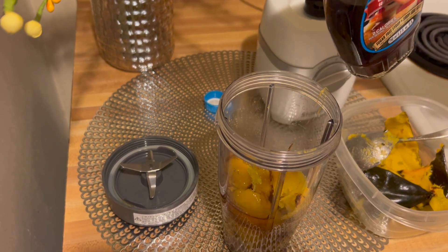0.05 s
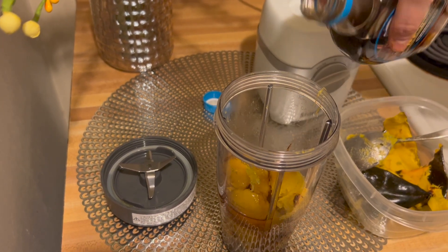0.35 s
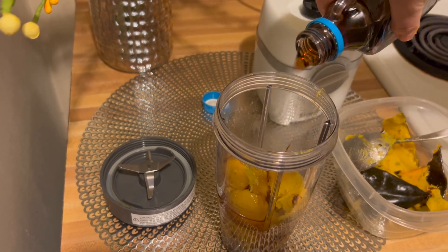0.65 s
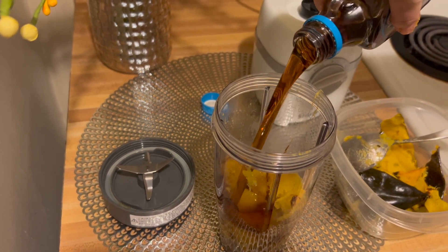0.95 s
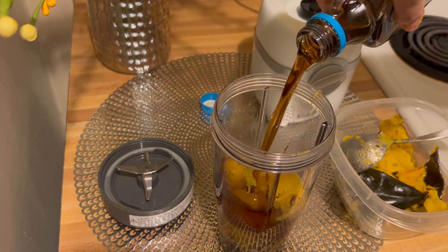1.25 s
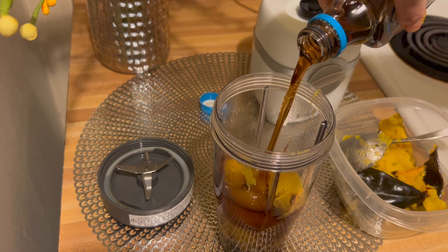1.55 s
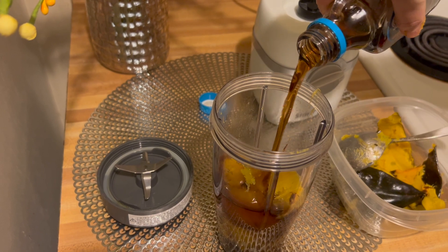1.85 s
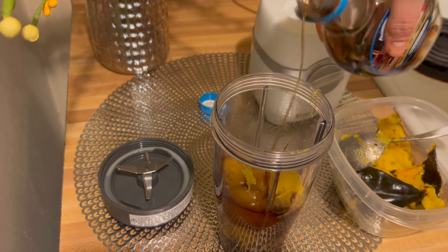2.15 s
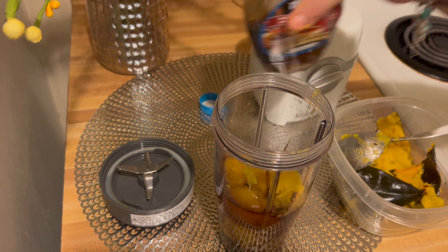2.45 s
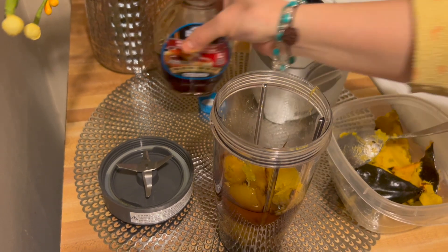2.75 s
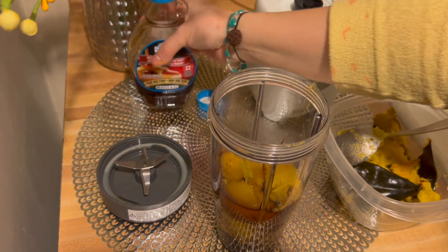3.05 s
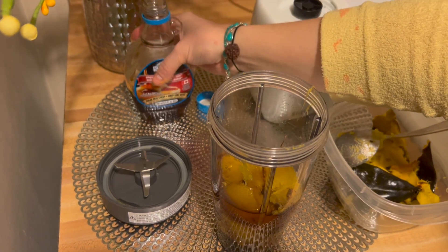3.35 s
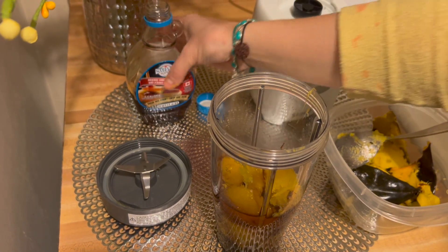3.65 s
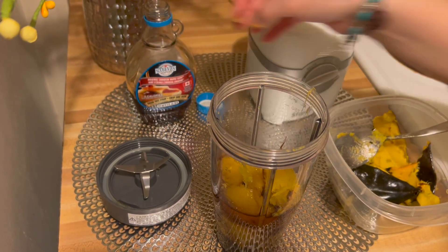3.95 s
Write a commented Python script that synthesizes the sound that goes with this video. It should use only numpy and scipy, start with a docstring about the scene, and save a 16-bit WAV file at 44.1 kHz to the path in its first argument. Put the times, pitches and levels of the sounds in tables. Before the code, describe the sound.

Syrup pours into a plastic blender cup with faint bubble pops, plops and sticky ticks. A bracelet clinks lightly, then the plastic bottle lands on the counter with a hollow thud. Heard close in a quiet, humming kitchen.

```python
"""Pouring syrup into a blender cup

Syrup runs from a plastic bottle onto soft squash in a quiet, humming kitchen. The thick stream is
almost silent: small bubbles pop, air pockets plop and the sticky bottle ticks. A bracelet clinks
and a sleeve rustles as the arm moves, then the bottle lands on the counter with a hollow thud."""
import sys
import numpy as np
from scipy import signal
from scipy.fft import rfft, irfft
from scipy.io import wavfile

SR = 44100
rng = np.random.default_rng(int(sys.argv[2]) if len(sys.argv) > 2 else 0)


def generate_wav(signal):
    """Clip the signal to [-1, 1] and save it as 16-bit WAV at the path in sys.argv[1]."""
    frames = np.transpose(np.atleast_2d(signal))
    scaled = np.clip(frames, -1, 1) * 32767
    pcm = np.round(scaled).astype(np.int16)
    wavfile.write(sys.argv[1], SR, pcm)


N = 176400
TIME = np.arange(N) / SR
HZ = np.fft.rfftfreq(N, 1 / SR)

# The fine, high fizz in both ticks and rustles: pitch_hz, level_db
FIZZ_TONE = [(7000, -52), (10500, -7), (12700, -6.5), (14000, -10), (15500, -36)]


def amp(db):
    """Turns decibels into a number to multiply a sound by."""
    return 10 ** (np.asarray(db) / 20)


def curve(points, hz):
    """Looks up values between rows of (pitch_hz, value), spacing octaves evenly."""
    pitches, values = np.transpose(points)
    return np.interp(np.log(hz + 1), np.log(pitches + 1), values)


def pan(db):
    """Left and right gains that make the left side louder by db."""
    return amp(np.array([[db / 2], [-db / 2]]))


def add(mix, start_s, sound):
    """Mixes a sound in at its start time."""
    part = mix[..., max(round(start_s * SR), 0):][..., :sound.shape[-1]]
    part += sound[..., :part.shape[-1]]


def fade(t, fade_s):
    """A level that falls by 60 dB in fade_s seconds."""
    return np.exp(-np.log(1000) * t / fade_s)


def puff(loudness, tone):
    """Noise that follows a loudness shape, filtered afterwards so its edges stay soft."""
    gain = amp(curve(tone, HZ))
    return irfft(rfft(loudness * rng.standard_normal(N)) * gain / np.sqrt(np.mean(gain ** 2)), N)


def room(sound, echo_db, build_s=0.0017):
    """Adds the kitchen's echoes, which build up and then die away, the highest fastest."""
    # How long the room rings: pitch_hz, fade_s
    ring_times = [(100, 0.45), (400, 0.33), (1200, 0.45), (4000, 0.22), (13000, 0.12)]
    echoes = rng.choice([-1., 1.], (2, SR // 2)) * (rng.random((2, SR // 2)) < .1)
    echoes *= np.minimum(TIME[:SR // 2] / build_s, 1) ** 2
    hz, t, bands = signal.stft(echoes, SR, nperseg=256)
    shared = 1 / (1 + (hz[:, None] / 450) ** 4)  # low echoes are alike on both sides
    bands[1] = shared * bands[0] + np.sqrt(1 - shared ** 2) * bands[1]
    tail = signal.istft(bands * fade(t, curve(ring_times, hz)[:, None]), SR, nperseg=256)[1]
    tail /= np.linalg.norm(tail, axis=1, keepdims=True)
    tail = signal.lfilter(*signal.butter(1, 272, "high", fs=SR), tail)
    return sound + amp(echo_db) * signal.fftconvolve(sound.mean(0)[None], tail, axes=1)[:, :N]


def kitchen_hum():
    """Ventilation makes a low rush of air, and appliances hum steady notes."""
    # The rush of air: pitch_hz, level_db
    air_tone = [(24, -23.5), (42, 1), (70, -1), (110, -7), (300, -13), (520, -21.5), (900, -18),
                (1600, -25), (2200, -39), (3200, -51.5), (6000, -57), (8800, -58.5), (12000, -55.5),
                (14500, -82)]
    # How alike the air sounds left and right: pitch_hz, likeness (1 = the same)
    air_likeness = [(50, 0.98), (200, 0.93), (500, 0.2), (1200, 0.045), (3000, 0.45), (12000, 0.13)]
    # Appliance notes: pitch_hz, level_db
    hum_notes = [(44, -62), (69, -66), (120, -61)]
    left, other = rfft(rng.standard_normal((2, N)))
    likeness = curve(air_likeness, HZ)
    right = likeness * left + np.sqrt(1 - likeness ** 2) * other
    air = irfft(np.array([left, right]) * amp(curve(air_tone, HZ)), N)
    hum = sum(amp(db) * np.sqrt(2) * np.sin(2 * np.pi * (hz * TIME + rng.random()))
              for hz, db in hum_notes)
    return pan(0.35) * (amp(-51.5) * air / air.std() + hum)


def bubbles(rows):
    """Each bubble rings for a few cycles, swelling and dying as its pitch climbs."""
    sound, t = np.zeros(N), TIME[:2048]
    sharpness, climb = 5, 0.072  # climb: share by which the pitch rises during the swell
    for peak_s, hz, db, length_ms in rows:
        rise_s = length_ms / 1000 * np.sqrt(sharpness / (8 * np.log(2)))
        age = t / rise_s
        swell = (age * np.exp(1 - age)) ** sharpness
        note = np.sin(2 * np.pi * hz * t * (1 + climb * (age / 2 - 1)))
        add(sound, peak_s - rise_s, amp(db) * swell * note)
    return sound


def crackles():
    """Random tiny bubbles, thickest when the stream starts and when it breaks off."""
    # Crackling along the pour: time_s, crackles_per_s, level_db
    crackling = [(0.759, 0, -65), (0.785, 902, -66), (.82, 52, -59.5), (1.5, 23, -79), (2.1, 30, -81),
                 (2.15, 507, -63), (2.2, 0, -87)]
    low_hz, high_hz, length_ms, spread_db = 1930, 4270, 0.88, 4
    times, rates, levels = np.transpose(crackling)
    chance, pitch, size = rng.random(N), rng.random(N), rng.standard_normal(N)
    hits = chance < np.interp(TIME, times, rates, left=0, right=0) / SR
    hz = low_hz * (high_hz / low_hz) ** pitch[hits]
    db = np.interp(TIME[hits], times, levels) + spread_db * size[hits]
    return bubbles(np.column_stack([TIME[hits], hz, db, np.full(len(hz), length_ms)]))


def syrup():
    """Bubbles burst with a wet snap, air pockets plop, and the sound bounces up and down the cup."""
    # Small bubbles bursting: peak_s, pitch_hz, level_db, length_ms
    pops = [(.015, 4020, -55.5, 0.99), (.1338, 4150, -54, 0.64), (0.5451, 4370, -49, 0.45),
            (0.7218, 6260, -56, 0.69), (0.8566, 4150, -38, 0.85), (0.856, 2566, -51.5, 2.12),
            (0.9377, 2620, -55, 1.4), (1.0051, 3260, -44.5, 0.55), (1.087, 3030, -46.5, 0.94),
            (1.1783, 2800, -55.5, 1.3), (1.2393, 3850, -61.5, 1.5), (1.3314, 2380, -58, 1),
            (1.358, 2570, -52.5, 1.7), (1.423, 3690, -49.5, 0.9), (1.646, 3260, -50, 0.63),
            (1.732, 6130, -63, 0.78), (1.859, 3170, -52, 0.49), (2.0301, 2730, -49.5, 1.02),
            (2.1038, 3990, -45.5, 0.69), (2.149, 2400, -56.5, 2.1), (2.1544, 3950, -53, 0.58),
            (2.307, 3490, -38.5, 0.64), (2.5117, 5930, -49, 0.23), (2.5304, 3760, -44.5, 0.59),
            (3.981, 2550, -49.5, 0.77)]
    # Air pockets folded in by the stream: peak_s, pitch_hz, level_db, length_ms
    plops = [(.7237, 670, -55, 3.6), (1.034, 770, -52, 4.5), (1.1315, 660, -51.5, 2.7),
             (1.2426, 750, -52.5, 3.5), (1.2783, 686, -50.5, 3.6), (1.7659, 905, -53, 4),
             (2.0203, 693, -48, 4.18), (2.0597, 833, -36.5, 2.3), (2.0743, 700, -57, 5.3)]
    # The snap of a bubble's skin tearing: pitch_hz, level_db
    skin_tone = [(1800, -23), (2500, -3.5), (4300, -5.5), (5300, -20), (8000, -27), (12000, -52)]
    # Notes of the cup that each pop rings: pitch_hz, width_hz, level_db
    cup_notes = [(2540, 400, -12.5), (4180, 370, -9)]
    tearing = np.zeros(N)
    for peak_s, _, db, _ in pops:
        add(tearing, peak_s, amp(db - 11) * fade(TIME[:SR // 20], fade_s=0.017))
    popping = bubbles(pops) + puff(tearing, skin_tone) + crackles()
    cup_ring = sum(amp(db) * signal.lfilter(*signal.iirpeak(hz, hz / width_hz, fs=SR), popping)
                   for hz, width_hz, db in cup_notes)
    direct = pan(3) * (popping + cup_ring) + pan(8.5) * bubbles(plops)
    sound = direct.copy()
    bounce_s, bounce_db = 0.0055, -12.5
    for bounce in (1, 2):
        add(sound, bounce * bounce_s, amp(bounce * bounce_db) * direct)
    return room(sound, echo_db=-7.5)


def bright_ticks():
    """Short, bright ticks: sticky clicks from the bottle and the snap of bracelet touches."""
    # Ticks, each a snap with fine fizz on top: start_s, snap_db, fizz_db
    ticks = [(0.33, -92, -60.5), (0.477, -57, -53), (0.573, -50, -54.5), (0.7778, -55, -53),
             (0.792, -50, -37.5), (0.8036, -49.5, -54), (0.855, -47, -64), (1.4937, -45, -69),
             (1.511, -70, -46.5), (1.618, -62, -63), (1.941, -45.5, -54.5), (2.1135, -60, -64),
             (2.1482, -54, -66), (2.3445, -49.5, -56), (2.652, -87, -54.5), (2.7353, -50, -55),
             (2.8335, -53, -54), (2.993, -61, -72), (3.112, -60, -66), (3.142, -55.5, -54),
             (3.65, -78, -59)]
    # The tone of the snap: pitch_hz, level_db
    snap_tone = [(1200, -13), (2500, -19), (5000, -5), (7800, 1.5), (10000, 2), (15500, -27)]
    loudness = np.zeros((2, N))
    for start_s, snap_db, fizz_db in ticks:
        add(loudness, start_s, amp([[snap_db], [fizz_db]]) * fade(TIME[:2048], fade_s=0.016))
    snap, fizz = loudness
    sound = (puff(snap, snap_tone) + puff(fizz, FIZZ_TONE)) / 2
    return room(pan(0.5) * sound, echo_db=-2)


def bracelet():
    """At each touch, beads rub together and a small metal charm rings briefly."""
    # Touches: start_s, level_db, main_pitch_hz, rest_db (turns the beads and other notes up or down)
    clinks = [(0.476, -61, 8200, -22), (.479, -48, 11000, -23), (1.941, -50, 7040, -21),
              (3.008, -72.5, 6900, 5), (3.055, -60, 6800, -8.5), (3.113, -77.5, 6900, 13),
              (3.138, -56, 6900, 0.5), (3.256, -59.5, 7040, 7)]
    # Notes of the charm: pitch_hz, level_db, fade_s
    charm_notes = [(4330, -7.5, 0.057), (5340, -12, .07), (6230, -7.5, .06), (6842, -1, 0.066),
                   (7200, -4.5, 0.046), (8080, -3.5, 0.051), (10900, -11, .1), (12900, -19, 0.068)]
    # Beads rubbing: pitch_hz, level_db
    bead_tone = [(1500, -11), (2900, -1.5), (8200, 1), (15500, -25)]
    ring, rub, t = np.zeros(N), np.zeros(N), TIME[:SR // 4]
    main_width_hz = 770
    for start_s, db, main_hz, rest_db in clinks:
        add(rub, start_s, amp(db + rest_db - 2.5) * fade(t, fade_s=0.036))
        for hz, note_db, fade_s in charm_notes:
            away = 1 - np.exp(-((hz - main_hz) / main_width_hz) ** 2)  # 0 at the main pitch, 1 far off
            note = fade(t, fade_s) * np.sin(2 * np.pi * hz * t)
            add(ring, start_s, amp(db + note_db + rest_db * away) * note)
    return room(pan(1) * (ring + puff(rub, bead_tone)), echo_db=-1.5)


def hiss_and_rustles():
    """Soft grainy swells of hiss as hand and sleeve brush; the slow one at 0.74 s is the hand turning the
    bottle."""
    # Swells: peak_s, fall_s (time to drop about 9 dB), hiss_db, fizz_db
    swells = [(.5, 0.032, -74, -76), (.74, 0.21, -74.5, -108), (2.163, 0.029, -70, -70.5),
              (2.35, 0.058, -82, -85), (2.66, 0.16, -93.5, -83), (3.0, .11, -80, -86.5),
              (3.399, 0.058, -95.5, -84.5), (3.51, 0.054, -91.5, -85.5), (3.96, 0.089, -74, -78.5)]
    # The tone of the hiss: pitch_hz, level_db
    hiss_tone = [(1500, 2), (3000, 0.5), (7500, 0.5), (15000, -14)]
    grains_per_s, grain_db, rise_share = 420, 6, 0.99
    grains = amp(grain_db * np.interp(TIME * grains_per_s, np.arange(N), rng.standard_normal(N)))
    loudness = np.zeros((2, N))
    for peak_s, fall_s, hiss_db, fizz_db in swells:
        from_peak_s = np.maximum((peak_s - TIME) / rise_share, TIME - peak_s)
        loudness += amp([[hiss_db], [fizz_db]]) * np.exp(-from_peak_s / fall_s)
    hiss, fizz = loudness * grains
    sound = (puff(hiss, hiss_tone) + puff(fizz, FIZZ_TONE)) / 2
    return room(np.array([sound, sound]), echo_db=-2)


def bottle_thud():
    """The bottle's base hits in a few quick pushes that ring it and the counter; hard ones also knock."""
    # It lands edge first, then with its whole weight: time_s, force_db, contact_ms
    landing = [(3.2514, -22, 0.72), (3.2542, -6.5, 1.07), (3.2571, -15.5, 0.69), (3.2595, 4, 2.64),
               (3.2636, -3.5, 2.55)]
    # Notes of bottle and counter: pitch_hz, level_db, fade_s
    counter_notes = [(77.7, -32.5, 0.81), (123, -29.5, 0.19), (160.6, -17, 0.094), (220.5, -16, 0.064),
                     (225.6, -36, 0.5), (302, -18, 0.046), (347, -30, 0.25), (410, -29, 0.069),
                     (511, -18.5, 0.071), (542, -16.5, 0.064), (690, -22.5, 0.033), (795, -24, 0.031),
                     (980, -25.5, 0.066), (1145, -18.5, 0.051), (1634, -13.5, 0.079)]
    # The noise of the contact: pitch_hz, level_db
    knock_tone = [(60, -25.5), (250, -7), (550, 8.5), (1150, -3.5), (1700, -15), (2550, -21.5), (3100, -29),
                  (4400, -29), (8000, -34), (15000, -40.5)]
    # The hollow middle pitches are louder and earlier on the left: pitch_hz, left_db, left_lead_radians
    sides = [(200, 1, 0.13), (380, 0.5, 0.25), (507, 14.5, 1.4), (720, 3, 0.6), (950, -2, 0),
             (1460, -1.5, 2), (2160, 2, 1.9), (8000, 1, -1.5)]
    force, contact, t = np.zeros(N), np.zeros(N), TIME[:SR]
    for time_s, db, contact_ms in landing:
        push = np.sin(np.pi * np.minimum(t * 1000 / contact_ms, 1)) ** 2
        add(force, time_s - contact_ms / 2000, amp(db) * push / push.sum())
        add(contact, time_s, amp(db) / max(contact_ms, 1) * fade(t, fade_s=0.022))
    ring = sum(amp(db) * fade(t, fade_s) * np.cos(2 * np.pi * hz * t)
               for hz, db, fade_s in counter_notes)
    knock = amp(-20.5) * np.array([puff(contact, knock_tone) for _ in range(2)])
    struck = signal.fftconvolve(force, ring)[:N] + knock
    bass_cut = signal.butter(1, 70.6, "high", fs=SR)  # the deepest notes pass poorly into the air
    sound = room(signal.lfilter(*bass_cut, struck), echo_db=-12, build_s=0.013)
    hz, left_db, left_lead = np.transpose(sides)
    lean = amp(np.outer([1, -1], curve(np.c_[hz, left_db], HZ) / 2))
    timing = np.exp(1j * np.outer([1, -1], curve(np.c_[hz, left_lead], HZ) / 2))
    return irfft(rfft(sound) * timing * lean / lean.mean(0), N)


def scene():
    """Everything heard at the counter."""
    return kitchen_hum() + syrup() + bright_ticks() + bracelet() + bottle_thud() + hiss_and_rustles()


def record(dry):
    """The microphone has a narrow dip in the treble, and the very highest pitches are cut off."""
    dip_hz, width_hz, dip_db, top_hz = 9920, 1030, -16.5, 15450
    dip = amp(dip_db * np.exp(-((HZ - dip_hz) / width_hz) ** 2))
    low_pass = signal.firwin(511, top_hz, window=("kaiser", 9), fs=SR)
    return signal.oaconvolve(irfft(rfft(dry) * dip, N), low_pass[None], "same")


dry = scene()
out = record(dry)
generate_wav(out)
```